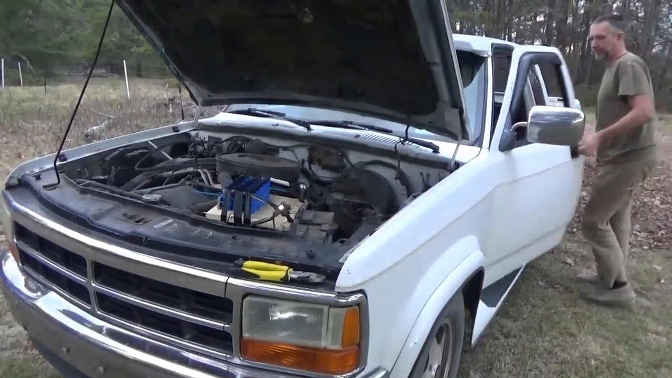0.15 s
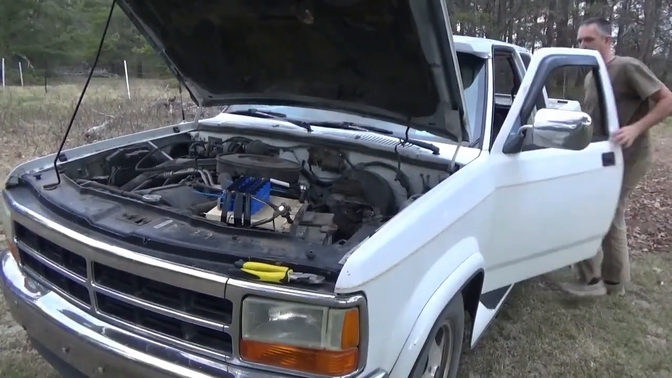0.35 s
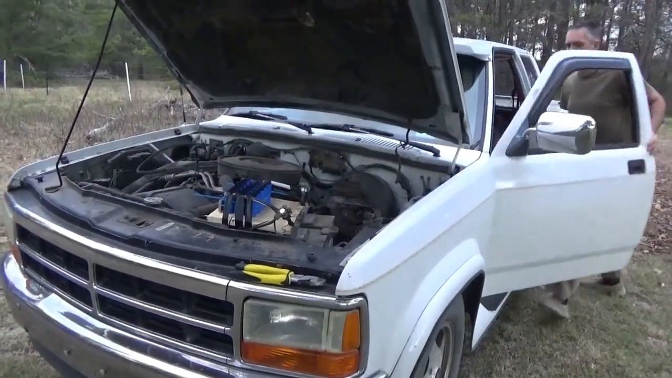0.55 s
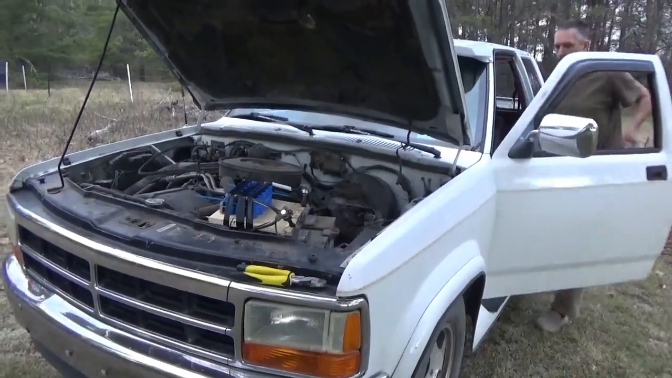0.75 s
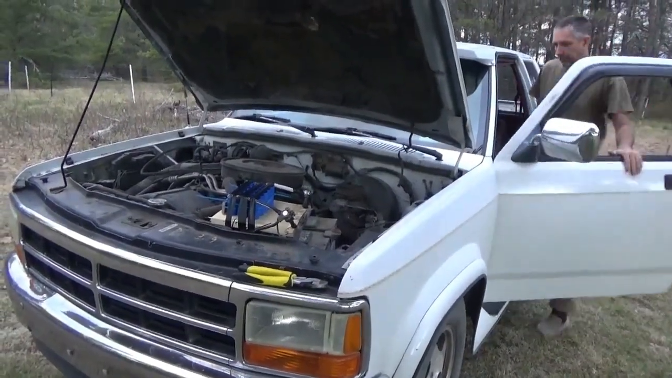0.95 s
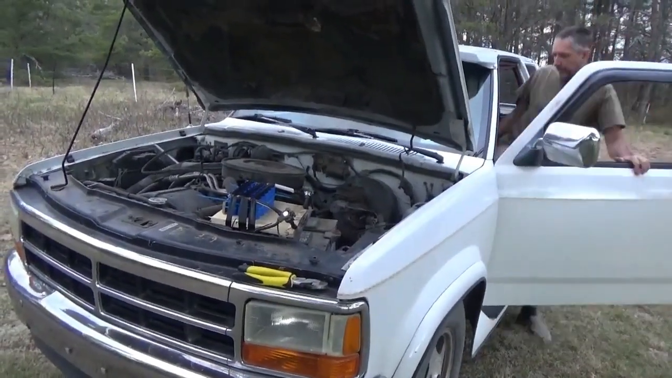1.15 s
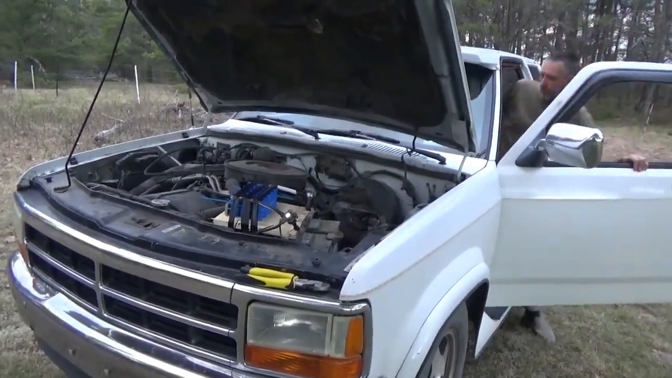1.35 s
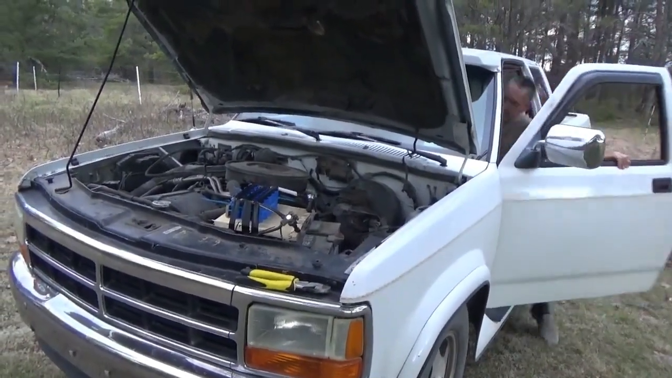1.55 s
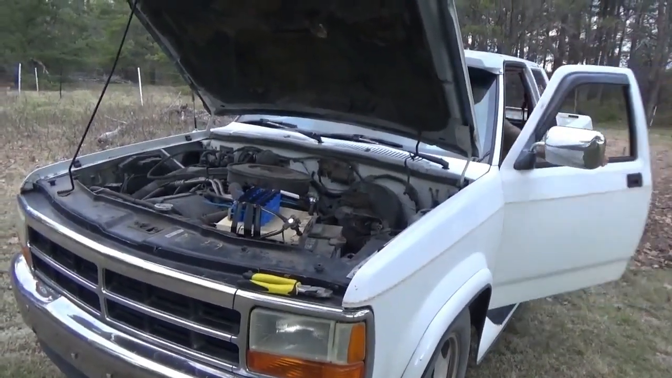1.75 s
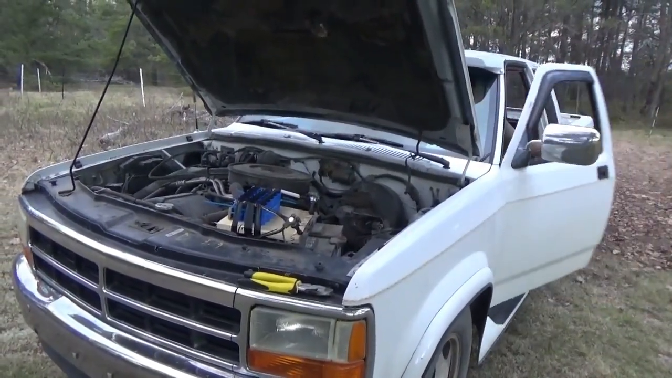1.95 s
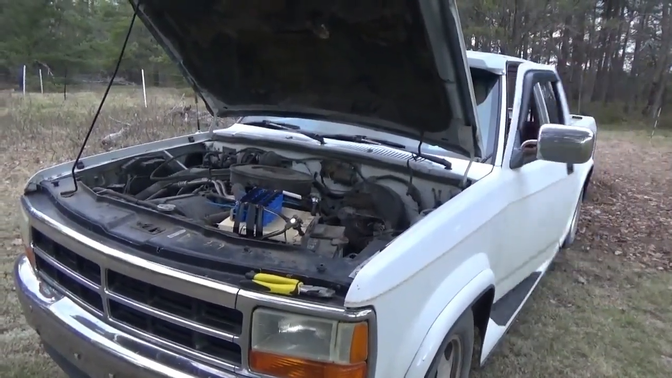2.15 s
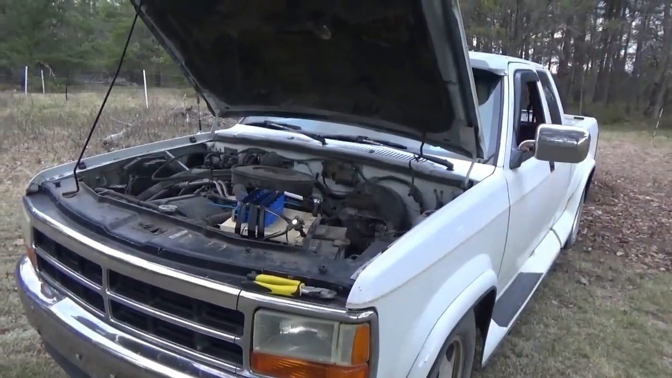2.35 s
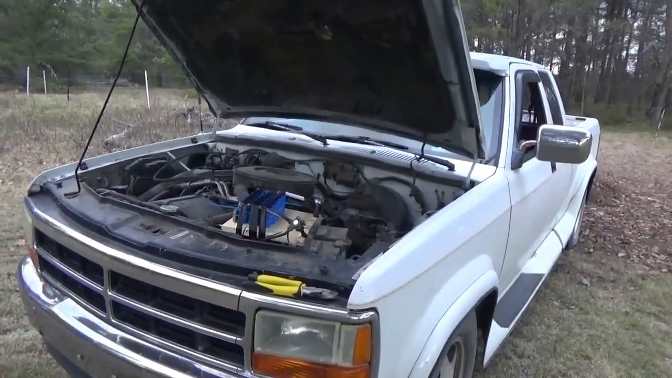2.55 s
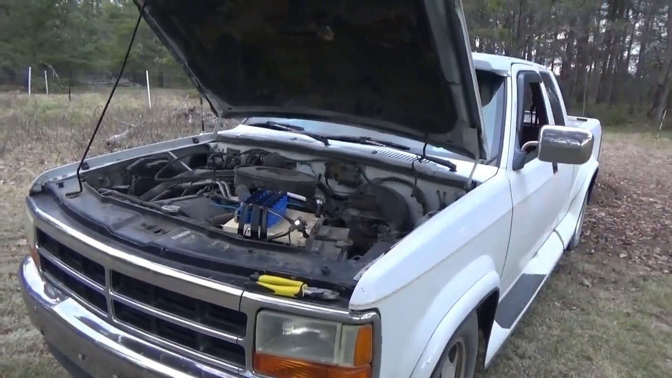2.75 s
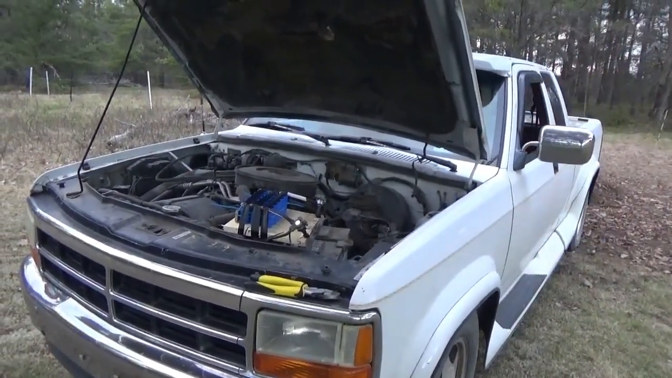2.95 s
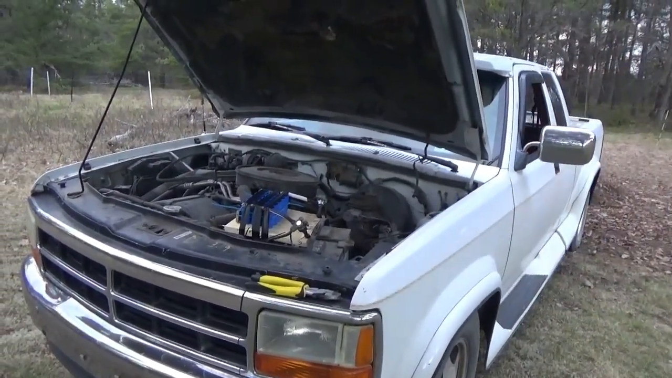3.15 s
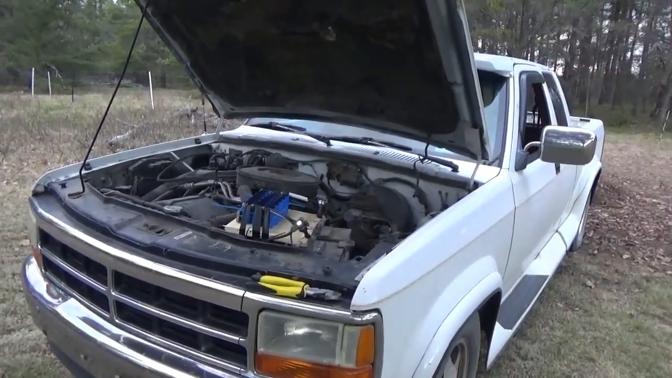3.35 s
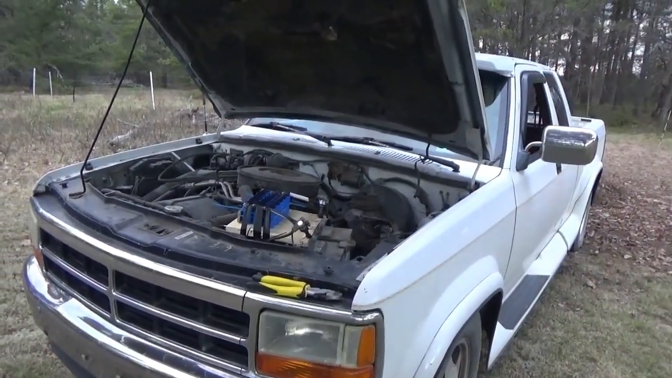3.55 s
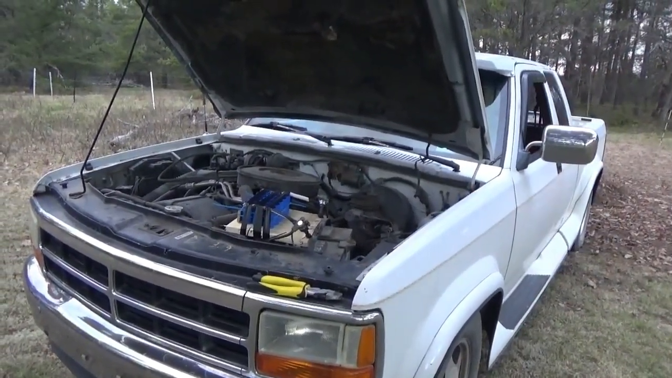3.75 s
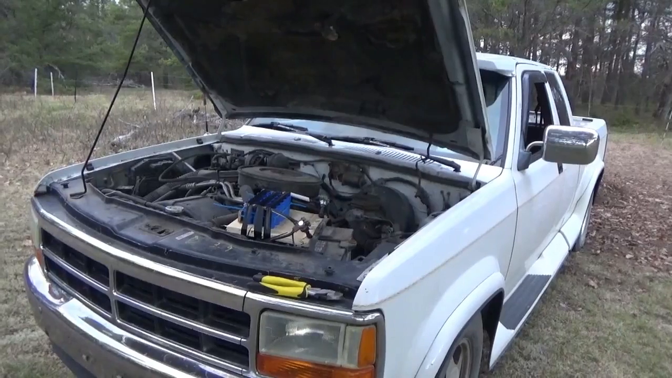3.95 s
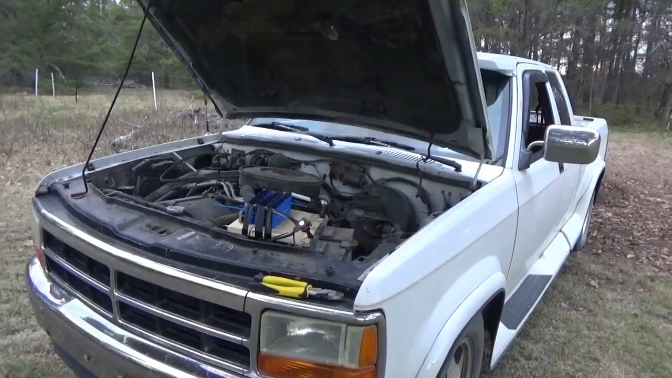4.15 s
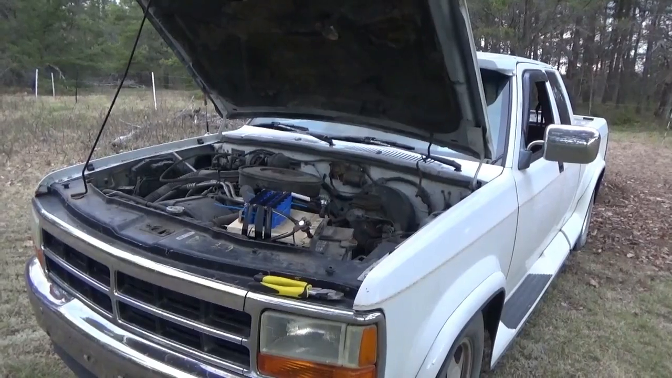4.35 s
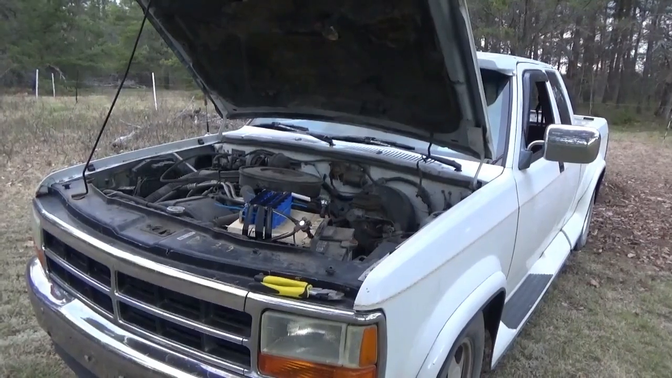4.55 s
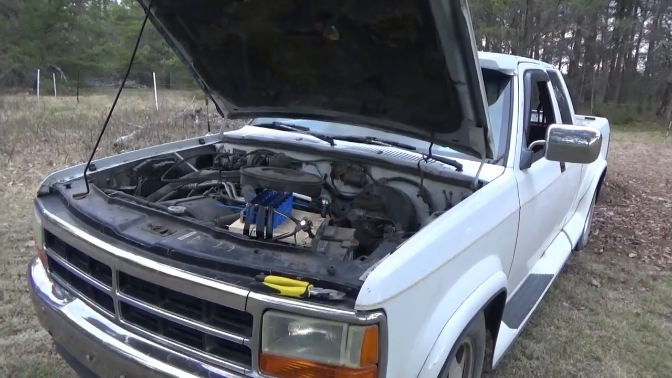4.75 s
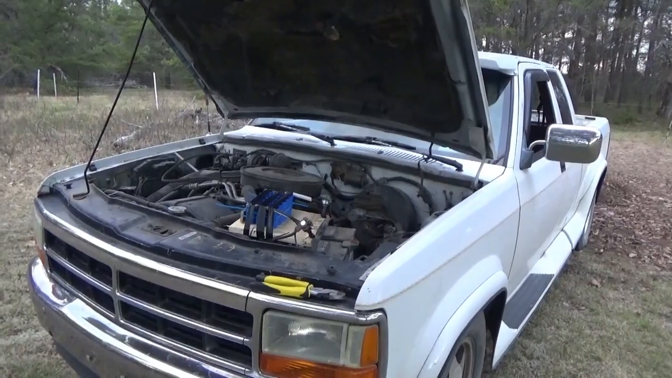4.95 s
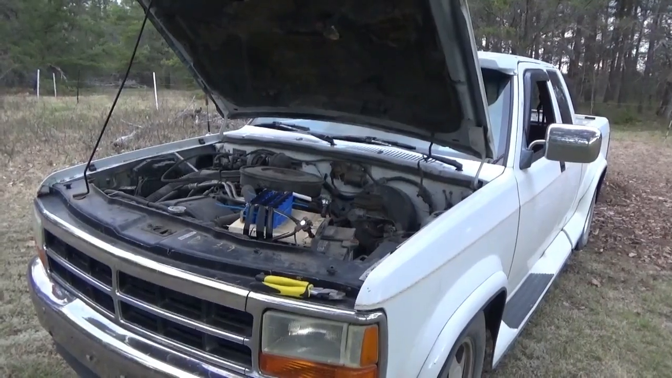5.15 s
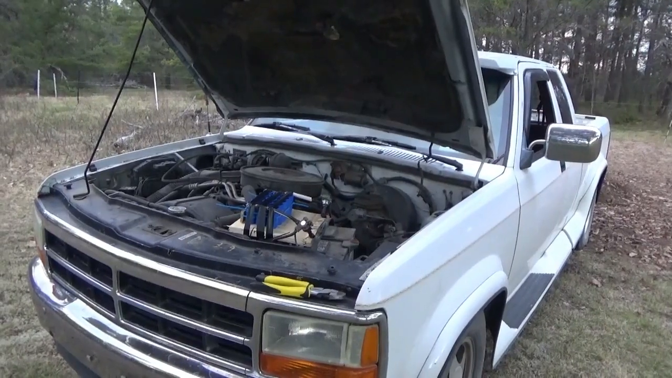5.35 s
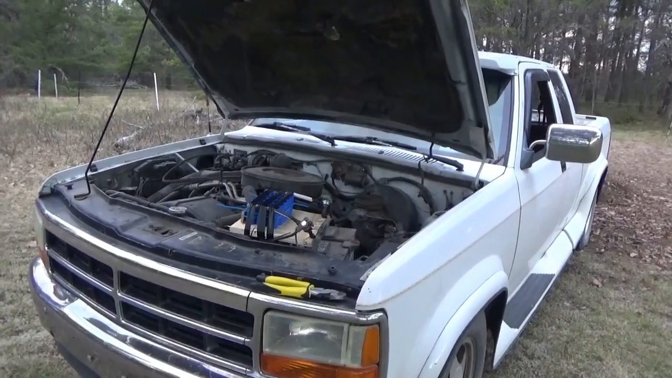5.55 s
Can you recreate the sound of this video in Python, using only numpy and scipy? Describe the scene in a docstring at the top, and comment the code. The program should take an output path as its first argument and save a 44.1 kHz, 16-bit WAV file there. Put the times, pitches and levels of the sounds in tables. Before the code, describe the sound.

Close stereo view of a pickup in quiet woods. The door latch clunks open, the door knocks sharply at its stop, clothes slide over the seat and keys jingle. A short hinge squeak leads into a heavy, rattling slam. Afterwards come small cabin clicks, two tiny bird chips, soft hiss and a faint fast ticking near the microphone.

```python
"""Quiet woods: broad hiss, two bird chips as falling sines, and a faint steady ticking close to the microphone.
Before them a pickup door is unlatched, swung to its stop and slammed: rattling contacts drive body modes.
Someone climbs in: jingling keys are brief high modes, knocks of feet, seat and switches share the body modes,
a low rumble of handling, shifting weight and the slam dying away is noise through the same modes,
clothes slide on the seat as grainy noise, and a hinge squeaks as noise through narrow resonances."""
import sys
import numpy as np
from scipy import signal
from scipy.fft import rfft, irfft
from scipy.io import wavfile
from scipy.ndimage import uniform_filter1d

SR = 44100
rng = np.random.default_rng(int(sys.argv[2]) if len(sys.argv) > 2 else 0)


def inscribe(sig):
    """Save sig as 16-bit PCM at rate SR to the path in sys.argv[1].

    A 1-D sig is mono; a 2-D sig holds one channel per row.
    Samples are clipped to [-1, 1] before scaling.
    """
    pcm = np.round(np.clip(np.atleast_2d(sig).T, -1, 1) * 32767)
    wavfile.write(sys.argv[1], SR, pcm.astype(np.int16))


N = 247646

# modes of the bodywork, by register: (frequency [Hz], relative level [dB], t60 [s])
BOOM_MODES = [(53.3, 6, 0.51), (87.5, -10, 0.28), (114, 8, 0.091), (144.2, 1.5, 0.5), (167.3, 2, 0.37)]
PANEL_MODES = [(252, -10, 0.058), (312, -2.5, 0.037), (334, 3.5, 0.056), (388.4, -1, 0.13), (515, 0, 0.013),
               (601.5, 3.5, 0.028), (672, 1, 0.053), (747.7, 3.5, 0.04), (814, -3.5, 0.027),
               (903, -10, 0.021)]
LATCH_MODES = [(1037, 8.5, 0.017), (1294, -0.5, 0.0076), (1395, 1, 0.02), (1538, -2.5, 0.035),
               (1613, -0.5, 0.0089), (1960, 3, 0.0064), (2148, -6, 0.079), (2323, 0.5, 0.0083)]


def amp(db):
    """Decibels to amplitude ratio: 20 dB is a factor of ten."""
    return 10 ** (np.asarray(db) / 20)


def rms_one(x):
    """Normalization of the mean power to 1."""
    return x / np.sqrt(np.mean(x ** 2) + 1e-20)


def even(x):
    """Energy normalization: every row of stereo sounds gets the same mean power."""
    return x / np.sqrt(np.mean(x ** 2, axis=(0, 2), keepdims=True) + 1e-30)


def sides(pan_db):
    """Interaural level difference: left and right gains pan_db apart."""
    return amp([[pan_db / 2], [-pan_db / 2]])


def curve(rows, column):
    """Level envelope: one table column interpolated at every sample, silent outside it."""
    rows = np.array(rows)
    return np.interp(np.arange(N) / SR, rows[:, 0], rows[:, column], left=-150, right=-150)


def at_hz(points, hz):
    """Spectral envelope: linear interpolation on a log-frequency axis."""
    points = np.array(points)
    return np.interp(np.log(hz), np.log(points[:, 0]), points[:, 1])


def colour(x, spectrum):
    """Linear filtering: each frequency is scaled by a dB spectrum, along the last axis."""
    hz = np.maximum(np.fft.rfftfreq(x.shape[-1], 1 / SR), 1)
    return irfft(rfft(x) * amp(at_hz(spectrum, hz)), x.shape[-1])


def drift(per_s):
    """Slow random modulation of rms 1: straight lines between per_s random values a second."""
    steps = rng.standard_normal(600)
    return rms_one(np.interp(np.arange(N) / SR * per_s, np.arange(600), steps))


def left_right(mid, side, alike):
    """Mid-side mixing: the shared part gives left and right their correlation."""
    alike = np.clip(alike, 0, 1)
    shared, own = np.sqrt(1 + alike) * mid, np.sqrt(1 - alike) * side
    return np.stack([shared + own, shared - own])


def pair(shape, alike):
    """Partly coherent noise: left and right of a given correlation."""
    mid, side = rng.standard_normal((2, *shape))
    return left_right(mid, side, alike) / np.sqrt(2)


def ring(x, hz, t60):
    """Damped resonator: a unit click sets a sine of height 1 ringing."""
    radius = amp(-60 / (max(t60, .003) * SR))
    angle = 2 * np.pi * hz / SR
    return signal.lfilter([0, np.sin(angle)], [1, -2 * radius * np.cos(angle), radius ** 2], x + 1e-18)


def strike(force, modes, spread_db, favoured_hz=1000, focus_db=0):
    """Modal superposition: each row of force drives every mode, strongest near its favoured frequency."""
    octaves_off = np.log2(np.array(modes)[:, 0] / np.reshape(favoured_hz, (-1, 1)))
    chance_db = spread_db * rng.standard_normal((force.shape[-2], len(modes)))
    strengths = amp(chance_db - focus_db * octaves_off ** 2)
    rung = 0
    for k, (hz, db, t60) in enumerate(modes):
        rung = rung + amp(db) * strengths[:, [k]] * even(ring(force, hz, t60))
    # little radiates outside the range of the modes
    edges_hz = [0.81 * modes[0][0], min(2.05 * modes[-1][0], .45 * SR)]
    return signal.sosfilt(signal.butter(2, edges_hz, "band", fs=SR, output="sos"), rung)


def place(sounds, times, levels_db):
    """Superposition in time: each sound's loudest 5 ms is brought to its level and laid at its time."""
    loudest = uniform_filter1d(np.mean(sounds ** 2, axis=0), size=220).max(axis=1)
    length = sounds.shape[-1]
    out = np.zeros((2, N + length))
    for k, s in enumerate(times):
        start = round(s * SR)
        out[:, start:start + length] += sounds[:, k] * amp(levels_db[k]) / np.sqrt(loudest[k])
    return out[:, :N]


def woods():
    """Diffuse field: smooth far hiss whose left-right correlation depends on frequency, full in the low bass."""
    # spectrum of the far hiss: (frequency [Hz], relative density [dB per Hz])
    hiss_spectrum = [(12, -49), (20, -8), (127, -5), (241, -5.5), (347, -5.5), (446, -6.5), (499, -6),
                     (542, -3.5), (1330, -10), (1660, -12), (1860, -13), (11800, -23), (16000, -28.5)]
    # left-right correlation: (frequency [Hz], likeness [0 to 1])
    likeness = [(60, 1), (180, 0.88), (550, 0.54), (1650, 0.013), (5000, 0.52), (15000, 0.17)]
    level_db = -56.5
    hz = np.maximum(np.fft.rfftfreq(N, 1 / SR), 1)
    mid, side = rfft(rng.standard_normal((2, N))) * amp(at_hz(hiss_spectrum, hz))
    both = irfft(left_right(mid, side, at_hz(likeness, hz)), N)
    return amp(level_db + 0.083 * drift(2.94)) * rms_one(both)


def birds():
    """Frequency modulation: short whistles whose pitch falls fast, then settles."""
    # chips: (time [s], length [s], from [Hz], to [Hz], level [dB])
    chips = [(3.326, 0.048, 11300, 9300, -59.5), (4.546, 0.035, 9400, 7950, -64)]
    out = np.zeros(N)
    for s, length, from_hz, to_hz, db in chips:
        u = np.linspace(0, 1, round(length * SR))
        hz = to_hz + (from_hz - to_hz) * (1 - u) ** 3.2
        swell = np.sin(np.pi * u ** 0.49)
        whistle = np.sin(2 * np.pi * np.cumsum(hz) / SR)
        out[round(s * SR):][:len(u)] += amp(db) * swell * whistle
    return out


def ticking():
    """Impulse response: evenly timed clicks of uneven strength set a short ring going."""
    # ring of a tick: (frequency [Hz], level at unit click [dB], t60 [s])
    tick_modes = [(3105, -63, 0.034), (3320, -68, 0.044)]
    ticks_per_s, start_s = 29.97, .031
    at = (np.arange(start_s, N / SR, 1 / ticks_per_s) * SR).astype(int)
    clicks = np.zeros(N)
    clicks[at] = amp(3.2 * rng.standard_normal(len(at)))
    return sum(amp(db) * ring(clicks, hz, t60) for hz, db, t60 in tick_modes)


def hinge():
    """Friction excitation: rubbing noise feeds narrow resonances that come and go."""
    # squeak envelope: (time [s], gain [dB])
    squeak = [(1.95, -80), (2.0, -66), (2.07, -68), (2.12, -66.5), (2.19, -60), (2.23, -67), (2.28, -65),
              (2.3, -68)]
    # resonances: (frequency [Hz], bandwidth [Hz], relative level [dB])
    tones = [(1700, 69, -3), (1832, 38, 4), (2180, 84, -1), (2725, 100, 2), (3720, 50, -2.5)]
    out = 0
    for hz, width_hz, db in tones:
        tone = ring(rng.standard_normal(N), hz, 2.2 / width_hz)    # narrower means longer ringing
        out = out + amp(db + 2.5 * drift(18)) * rms_one(tone)
    return out * amp(curve(squeak, 1)) * sides(-4.0)


def sliding():
    """Power addition: gain of the clothes, soft-edged strokes over a faint rustle."""
    # rustle between strokes: (time [s], level [dB])
    rustle = [(0, -58), (.3, -62), (.52, -57.5), (1.0, -59), (1.3, -61.5), (1.85, -63.5), (2.3, -62),
              (3.0, -65.5)]
    # strokes on the seat: (time [s], length [s], start level [dB], end level [dB])
    strokes = [(0, 0.25, -55, -53), (0.538, 0.23, -52, -55), (0.827, 0.21, -59, -59),
               (1.05, .12, -48, -43.5), (1.175, 0.053, -57, -47), (1.544, 0.23, -55.5, -58),
               (1.96, 0.12, -62, -62)]
    edge_s = 0.027    # attack and release
    t = np.arange(N) / SR
    power = amp(curve(rustle, 1)) ** 2
    for s, length, start_db, end_db in strokes:
        edges = np.clip(np.minimum(t - s, s + length - t) / edge_s + .5, 0, 1)
        stroke = edges * amp(np.interp(t, [s, s + length], [start_db, end_db]))
        power = power + stroke ** 2
    return np.sqrt(power)


def rumble_and_cloth():
    """Modal filtering of noise: uneven noise rumbles in the body modes; clothes slide in grainy hiss."""
    # low rumble of handling, shifting weight and the slam dying away: (time [s], level [dB])
    rumble_levels = [(0, -49.5), (.17, -57), (.3, -42), (.5, -58), (1.1, -49.5), (1.45, -55), (1.7, -41.5),
                     (1.85, -57), (2.3, -54.5), (2.55, -44.5), (2.7, -54), (3.0, -56.5), (3.3, -64)]
    # spectrum of sliding cloth: (frequency [Hz], relative density [dB per Hz])
    cloth_spectrum = [(590, -13), (1000, -7), (1320, -6.5), (1710, -9), (2180, -18), (2530, -8),
                      (3890, -5.5), (5570, -10), (6700, -16), (9170, -6), (10800, -14), (14100, -10),
                      (16000, -27)]
    uneven = pair((1, N), 0.98) * amp(1.73 * drift(55))
    rumble = amp(-2) * strike(uneven, BOOM_MODES, 0, 125, 3.0)
    rumble = rumble + strike(uneven, PANEL_MODES, 0)
    rumble = rumble + amp(-6.5) * strike(uneven, LATCH_MODES, 0)
    cloth = colour(pair((N,), 0.48), cloth_spectrum) * amp(2.0 * drift(60.52))
    return amp(curve(rumble_levels, 1)) * rms_one(rumble[:, 0]) + sliding() * rms_one(cloth) * sides(-2.5)


def keys():
    """Small-body resonance: a soft-edged few-millisecond noise burst rings high modes, a fainter touch follows."""
    # keys touching: (time [s], level of the loudest 5 ms [dB])
    touches = [(0.047, -42), (1.5668, -38), (1.591, -40), (1.614, -41.5), (1.6524, -41.5), (1.671, -52),
               (1.687, -44), (1.707, -44), (1.727, -43), (1.7552, -41.5), (1.773, -46), (2, -41.5),
               (2.016, -39.5), (2.038, -47), (2.071, -51.5), (2.2385, -53), (2.256, -48), (2.282, -39),
               (2.397, -46), (2.422, -40), (2.4383, -40), (2.4653, -45), (2.698, -53), (2.9262, -47.5)]
    # modes of the keys: (frequency [Hz], relative level [dB], t60 [s])
    key_modes = [(7100, -22, .012), (8000, 14.5, 0.0056), (8800, 4, 0.018), (9500, 9, 0.0052),
                 (10270, 13, 0.0075), (10600, 7, 0.011), (11200, 13, 0.0041), (12150, 8, 0.01),
                 (13100, 0, 0.011), (13840, -5, .012), (15500, -10, 0.0043)]
    rows, t = np.array(touches), np.arange(SR // 16) / SR
    after_s = rng.uniform(0.0087, 0.012, (len(rows), 1))
    first = np.exp(-((t - .005) / 0.0036) ** 2)
    second = amp(-16) * np.exp(-((t - .005 - after_s) / 0.0079) ** 2)
    force = pair((len(rows), len(t)), 0.64) * (first + second)
    burst = signal.sosfilt(signal.butter(3, [7000, 13500], "band", fs=SR, output="sos"), force)
    clinks = strike(force, key_modes, spread_db=6.0)
    return place(even(clinks) + amp(-11) * even(burst), rows[:, 0], rows[:, 1])


def outdoors(x):
    """Convolution: a short dull scatter from ground, hood and trees, partly different in each ear."""
    level_db, t60_s, cut_hz = -20.5, 0.35, 1160
    t = np.arange(SR // 2) / SR
    scatter = pair(t.shape, 0.75) * amp(-60 * t / t60_s) * (t > .004)
    scatter = signal.lfilter(*signal.butter(1, cut_hz, fs=SR), scatter)
    scatter = amp(level_db) * scatter / np.sqrt(np.sum(scatter ** 2, axis=1, keepdims=True))
    return x + signal.fftconvolve(x, scatter, axes=1)[:, :N]


def blows(rows, panel_hz, latch_hz, rise_share, pan_db, lumpy_db, focus_db, crack_cut_hz):
    """Impact excitation: a lumpy, dying rattle of contacts drives the modes and leaves a bright crack."""
    # spectrum of the crack: (frequency [Hz], relative density [dB per Hz])
    crack_spectrum = [(1180, -45), (2000, -8), (2460, -1), (2760, -12.5), (5160, -6.5), (6880, -17),
                      (9740, -8.5), (12100, -12), (14200, -4), (16000, -13)]
    # modes of the trim: (frequency [Hz], relative level [dB], t60 [s])
    trim_modes = [(2950, 0, 0.027), (3160, 11.5, 0.013), (3440, -13, 0.024), (3730, 11, 0.0045),
                  (4450, 0, 0.054), (5340, -1, 0.043), (5900, -3.5, 0.014)]
    t = np.arange(SR // 4) / SR
    shape = (len(rows), len(t))
    t60 = np.clip(rows[:, [5]], .005, .4)
    lumps = amp(lumpy_db * np.repeat(rng.standard_normal((len(rows), len(t) // 45)), 45, axis=1))
    rise = 1 - np.exp(-(t / (rise_share * t60)) ** 2)    # long rattles also build up slowly
    boom_hz = np.interp(rows[:, 2], [-36, -27], [150, 70])    # heavy blows favour the deepest modes
    # (level column, modes, favoured Hz, focus factor, t60 factor, likeness, lean): lows lean less to one side
    registers = ((2, BOOM_MODES, boom_hz, 1.8, 0.93, 1.0, 0.25),
                 (1, PANEL_MODES, panel_hz, 0.71, 1.54, 0.99, 0.7),
                 (3, LATCH_MODES, latch_hz, 4.9, 1.6, 0.99, 0.84))
    out = 0
    for column, modes, hz, focus, lasts, alike, lean in registers:
        force = pair(shape, alike) * lumps * rise * amp(-60 * t / (lasts * t60))
        sounds = strike(force, modes, 3.6, hz, focus * focus_db)
        sounds = sounds * np.clip((t[-1] - t) / .05, 0, 1)    # fade to the end of the buffer
        out = out + place(sounds, rows[:, 0], rows[:, column]) * sides(pan_db * lean)
    dying = lumps * rise ** 2 * amp(-60 * t / t60)
    hiss = colour(pair(shape, 0.4), crack_spectrum)
    hiss = signal.lfilter(*signal.butter(2, crack_cut_hz, fs=SR), hiss)
    clatter = strike(pair(shape, 1.0) * dying, trim_modes, spread_db=7.0)
    crack = even(hiss * dying) + amp(0.5) * even(clatter)
    return out + place(crack, rows[:, 0], rows[:, 4]) * sides(pan_db)


def cab_knocks():
    """Modal excitation by knocks of feet, seat and switches; the boom follows the panel level."""
    # knocks: (time [s], panel level [dB], latch level [dB], crack level [dB], base rattle t60 [s])
    knocks = [(0.002, -43.5, -77, -53, 0.073), (0.446, -39, -73, -61, 0.072), (0.47, -40.5, -64, -60, 0.18),
              (0.498, -41, -58, -70, 0.065), (0.512, -36.5, -46.5, -47.5, 0.06),
              (0.573, -47, -59, -75, 0.055), (0.653, -56, -51.5, -48, 0.053),
              (0.735, -46, -52.5, -70, 0.055), (0.847, -40.5, -49, -69, 0.066),
              (1.133, -44, -65, -44, 0.02), (1.174, -52, -48.5, -49.5, 0.07), (1.21, -47.5, -53, -51, 0.16),
              (1.28, -43, -52, -73, 0.043), (1.511, -46.5, -76, -73, 0.061), (1.559, -41, -64, -59, 0.12),
              (1.583, -30.5, -66, -69, 0.058), (1.69, -64, -44, -48, 0.024),
              (1.71, -36.5, -44.5, -66, 0.063), (1.933, -51, -52.5, -55.5, 0.075),
              (2.0, -39.5, -57, -50, 0.075), (2.03, -51, -57, -56, 0.12), (2.801, -49.5, -55, -72, 0.082),
              (2.853, -40, -52, -58, 0.11), (2.892, -42.5, -35, -37.5, 0.046),
              (2.905, -41, -43, -48, 0.065), (2.933, -44, -45, -56, 0.1), (2.945, -42.5, -43, -51, 0.058),
              (3.452, -51.5, -54.5, -65, 0.14), (3.773, -50.5, -52.5, -67, 0.11),
              (4.825, -55.5, -62, -76, 0.17), (4.86, -51, -77, -77, 0.064),
              (4.947, -40, -36.5, -43.5, 0.055), (4.962, -39, -62, -52, 0.059),
              (5.077, -48, -44, -60, 0.074), (5.097, -42.5, -43.5, -43.5, 0.086),
              (5.121, -41.5, -39, -40.5, 0.072), (5.459, -50.5, -68, -70, 0.14),
              (5.531, -55.5, -63, -67, 0.096)]
    rows = np.array(knocks)
    rows = np.insert(rows, 2, rows[:, 1] - 19, axis=1)    # boom 19 dB under the panel
    return blows(rows, panel_hz=584, latch_hz=1390, rise_share=0.043, pan_db=-.8, lumpy_db=0.5,
                 focus_db=2.0, crack_cut_hz=9000)


def door_blows():
    """Repeated impact: each blow on door and latch rebounds twice, duller each time."""
    # blows; the spot struck favours some modes: (time [s], panel level [dB], boom level [dB], latch level [dB],
    # crack level [dB], base rattle t60 [s], favoured panel frequency [Hz], favoured latch frequency [Hz])
    struck = [(0.155, -40.5, -61, -65, -46, 0.18, 470, 1550),
              (0.173, -28, -42, -35.5, -39.5, 0.074, 366, 2100),
              (0.191, -15, -36, -23, -24, 0.043, 357, 1820), (0.252, -28.5, -53, -39, -45, 0.06, 570, 1490),
              (0.272, -25, -57, -38, -46.5, 0.054, 620, 1300),
              (0.966, -33, -40.5, -53, -41, 0.051, 500, 1400),
              (0.991, -18.5, -45, -13.5, -30.5, 0.028, 477, 1440),
              (2.26, -34.5, -64, -48, -50, 0.066, 567, 1400), (2.292, -35, -40, -48, -37, 0.15, 500, 1400),
              (2.303, -22.5, -26.5, -19.5, -25.5, 0.08, 680, 1270),
              (2.32, -16, -39, -28, -20, 0.09, 690, 1350), (2.332, -25, -27, -25, -19, 0.064, 400, 1960),
              (2.349, -16, -27.5, -21.5, -26.5, 0.087, 353, 1560),
              (2.366, -29, -26.5, -28.5, -32.5, 0.12, 730, 1470),
              (2.397, -22.5, -29, -36, -31, 0.057, 342, 1500),
              (2.411, -38, -32, -29.5, -38, 0.14, 570, 1480), (2.424, -25, -39, -41, -35, 0.086, 675, 1400),
              (2.465, -36, -39, -44.5, -46, 0.13, 504, 1410)]
    # first and second rebound: (panel loss [dB], boom loss [dB], latch loss [dB], crack loss [dB])
    rebound_loss = [(8, 6, 28, 20), (16, 5.2, 110, 41)]
    rebound_after_s, rebound_t60_s = (.016, .043), .085    # delays vary by up to a tenth
    rows = np.array(struck)
    late = rng.uniform(.9, 1.1, (len(rows), 2)) * rebound_after_s
    hits = [rows]
    for k, loss_db in enumerate(rebound_loss):
        rebound = rows.copy()
        rebound[:, 0] += late[:, k]
        rebound[:, 1:5] -= loss_db
        rebound[:, 5] = rebound_t60_s
        hits.append(rebound)
    hits = np.vstack(hits)
    return blows(hits, panel_hz=hits[:, 6], latch_hz=hits[:, 7], rise_share=0.034, pan_db=-3.5, lumpy_db=2.5,
                 focus_db=10.5, crack_cut_hz=9800)


def scene():
    """Superposition of all sources; only door and cab knocks stir the outdoor echoes."""
    background = woods() + birds() + ticking()
    person = hinge() + rumble_and_cloth() + keys()
    return background + person + outdoors(cab_knocks() + door_blows())


def record(dry):
    """Transducer limits: the small microphone loses the deepest bass, peaks are rounded, the top is cut."""
    low_hz, cutoff_hz = 32, 16250
    heard = signal.sosfilt(signal.butter(2, low_hz, "high", fs=SR, output="sos"), dry)
    rounded = 0.88 * np.tanh(heard / 0.94)
    return signal.sosfilt(signal.cheby2(20, 70, cutoff_hz, fs=SR, output="sos"), rounded)


dry = scene()
out = record(dry)
inscribe(out)
```